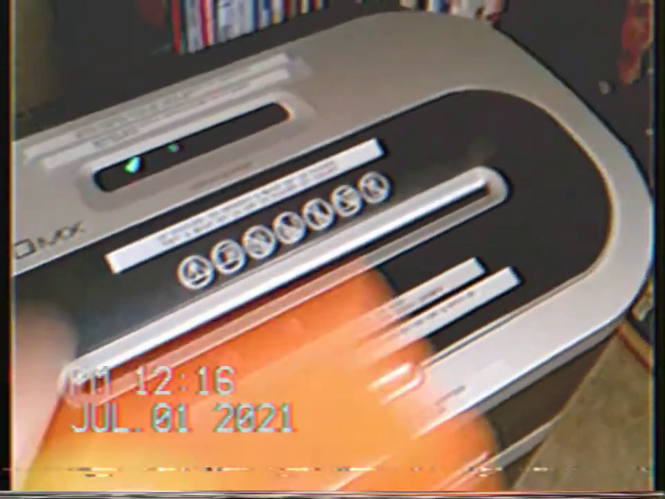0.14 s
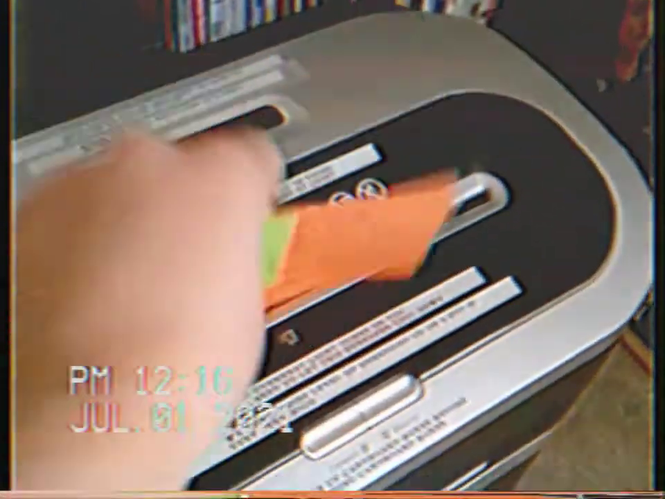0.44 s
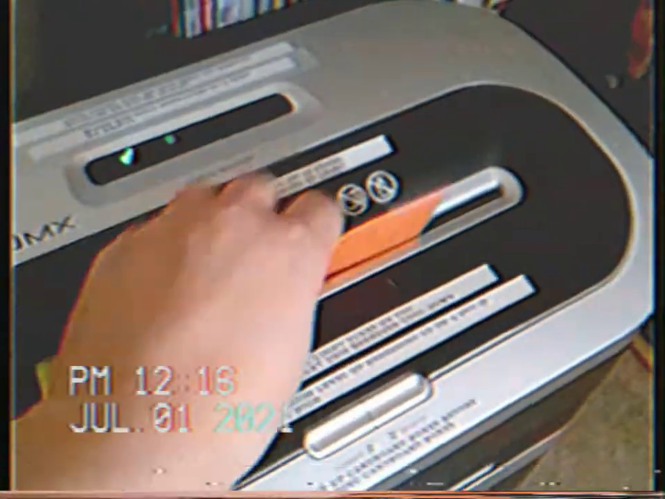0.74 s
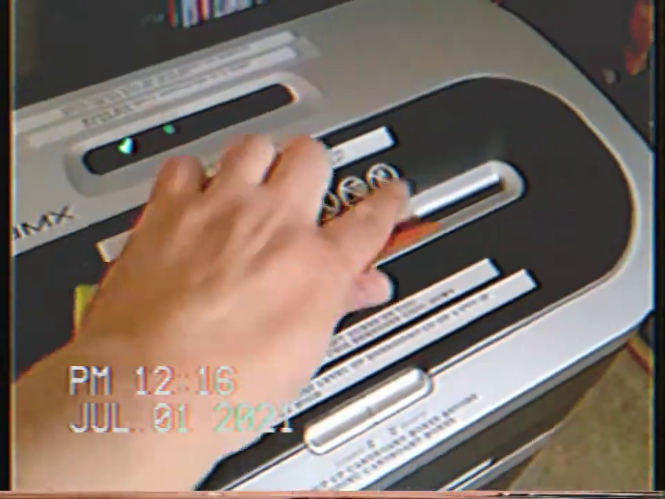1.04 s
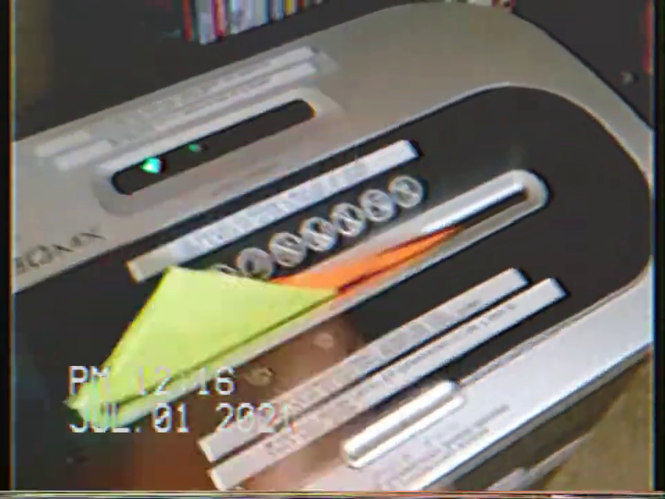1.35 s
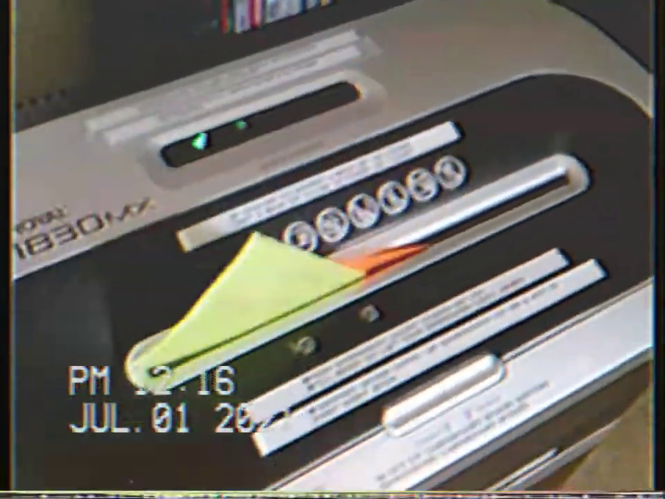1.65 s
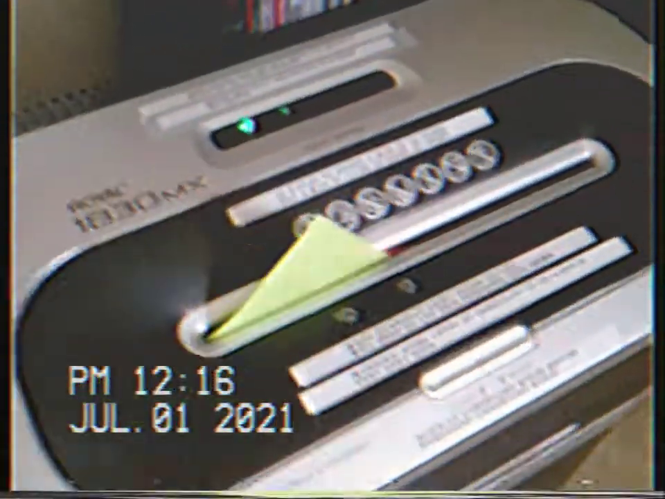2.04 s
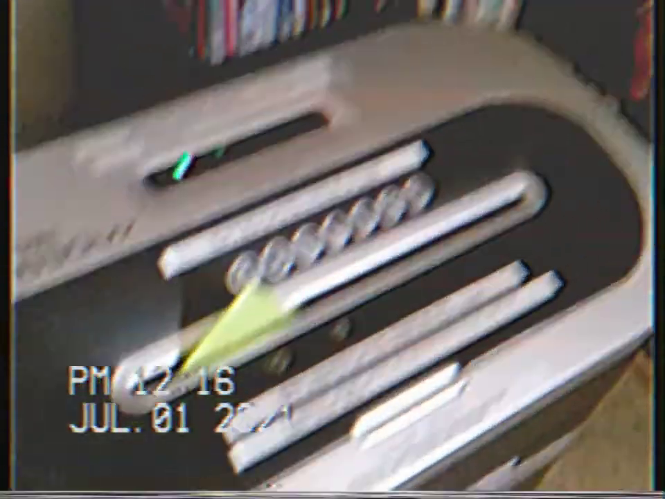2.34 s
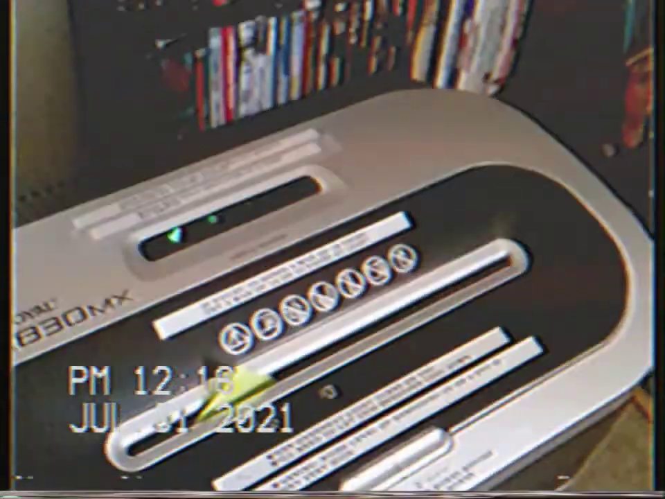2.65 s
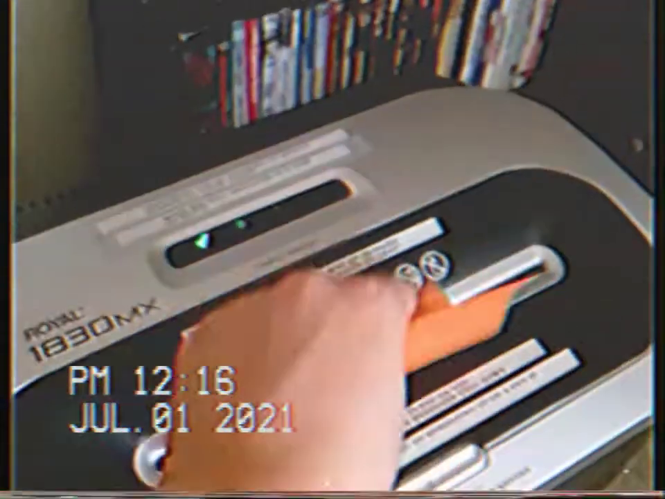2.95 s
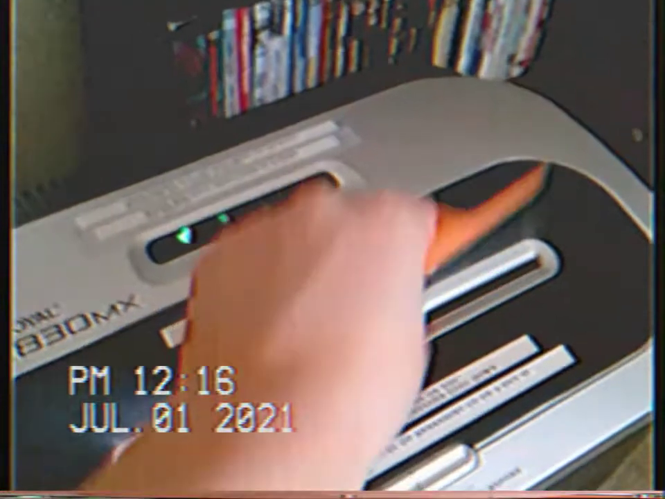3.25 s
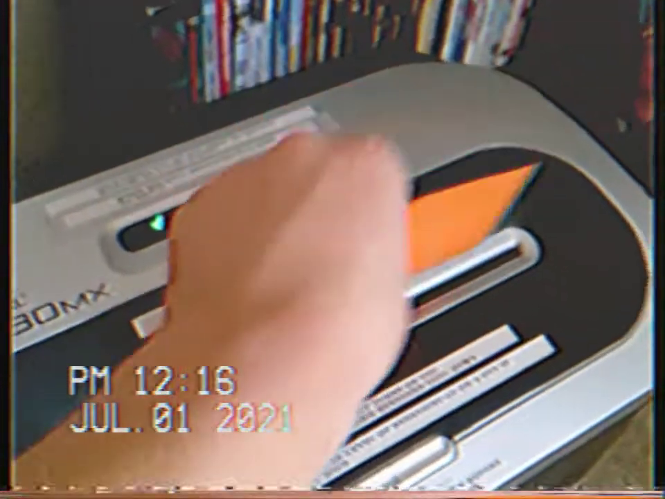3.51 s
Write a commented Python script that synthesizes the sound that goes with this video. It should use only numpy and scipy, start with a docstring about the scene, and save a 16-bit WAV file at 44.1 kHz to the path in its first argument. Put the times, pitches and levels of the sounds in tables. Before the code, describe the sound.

Paper shredder running with a low motor hum while paper crunches, crackles and finally slaps the lid.

```python
"""In a small room, a paper shredder runs close by.
Its motor hums and whines as unsteady sines, and the plastic case rumbles as coloured noise with a narrow boom.
The cutters tear sheets as clumped, grainy noise, and scuffs swell briefly out of it. Folds knock, creases crack
and the case thuds as short decaying bursts. Near the end a sheet slaps the lid, which rings in a few dull modes.
Folds, creases, thuds and slap also feed the room's noise-like tail."""
import sys
import numpy as np
from scipy import signal
from scipy.fft import rfft, irfft, next_fast_len
from scipy.io import wavfile
from scipy.ndimage import map_coordinates

SR = 44100
rng = np.random.default_rng(int(sys.argv[2]) if len(sys.argv) > 2 else 0)


def gain_from_db(level_db):
    """Turn a decibel level (scalar or array-like) into a linear amplitude factor."""
    decades = np.asarray(level_db, float) / 20
    return 10 ** decades


def to_wav(sig):
    """Store sig (one row per channel, or 1-D mono) as 16-bit WAV at the path in sys.argv[1].

    Samples outside -1..1 are clipped; the rate is SR.
    """
    pcm = np.clip(np.atleast_2d(sig), -1, 1) * 32767
    pcm = np.round(pcm).astype(np.int16)
    wavfile.write(sys.argv[1], SR, pcm.T)  # frames by channels


N = 162288  # samples

# treble of the tearing over time: start_s, level_db
TREBLE = [(0.0, -70.5), (0.59, -70.5), (0.94, -64), (1.24, -69), (1.37, -67.5), (1.92, -60.5), (2.21, -65),
          (3.1, -64.5), (3.3, -64), (3.48, -67), (3.68, -67.5)]


def unit(x):
    """Scales a signal to rms 1."""
    return x / np.sqrt(np.mean(x ** 2) + 1e-20)


def along(points, hz):
    """Reads a (pitch_hz, level_db) spectrum on a log frequency axis, near silent outside its ends."""
    point_hz, level_db = np.transpose(points)
    return np.interp(np.log(hz + 1), np.log(point_hz + 1), level_db, left=-120, right=-120)


def curves(rows):
    """Draws straight lines through each column after the time, one value per sample."""
    start_s, *columns = np.transpose(rows)
    return [np.interp(np.arange(N) / SR, start_s, column) for column in columns]


def wobble(rate_hz):
    """A smooth random curve with rate_hz knots a second."""
    knots = rng.standard_normal(int(N * rate_hz / SR) + 4)
    return map_coordinates(knots, [np.arange(N) * rate_hz / SR])


def coloured(x, spectrum):
    """Filters x through a (pitch_hz, level_db) spectrum and scales it to rms 1."""
    size = next_fast_len(len(x) + 4096)
    gain = gain_from_db(along(spectrum, np.fft.rfftfreq(size, 1 / SR)))
    return unit(irfft(rfft(x, size) * gain, size)[:len(x)])


def tone(hz, wander_hz, flutter_db):
    """A sine of about rms 1 whose pitch and level drift at random."""
    phase = 2 * np.pi * np.cumsum(hz + wander_hz * wobble(12)) / SR
    sine = np.sin(phase + rng.uniform(0, 2 * np.pi))
    return np.sqrt(2) * sine * gain_from_db(flutter_db * wobble(14))


def add_at(out, start_s, sound):
    """Mixes a short sound into out from start_s on."""
    out[round(start_s * SR):][:len(sound)] += sound


def room(x):
    """Convolves each 0.2 s stretch with a fresh noise tail whose frequencies die at their own speeds."""
    # reverberation time of the room: pitch_hz, t60_s
    decay_times = [(400, 0.28), (2000, 0.31), (6000, 0.21), (14000, 0.28)]
    out, step = np.zeros(N + SR), SR // 5
    for i in range(0, N, step):
        hz, t, noise = signal.stft(rng.standard_normal(SR // 2), SR, nperseg=256)
        t60_s = np.interp(hz, *np.transpose(decay_times))
        tail = signal.istft(noise * gain_from_db(-60 * t / t60_s[:, None]), SR, nperseg=256)[1]
        delayed = np.pad(x[i:i + step], (150, 0))  # 150 samples, about 3.4 ms
        wet = signal.fftconvolve(delayed, tail / np.linalg.norm(tail))
        out[i:i + len(wet)] += wet
    return out[:N]


def case():
    """The plastic case: broad coloured noise and a narrow noise boom; the gears follow half the boom's moves."""
    # motor noise over time: start_s, rumble_db (before a trim), boom_db, whine_db (unused here)
    motor_levels = [(0.0, -50, -54, -60), (0.54, -49.5, -53, -54), (1.2, -46.5, -44.5, -50),
                    (1.67, -45.5, -46.5, -55), (2.12, -46.5, -48.5, -54.5), (2.95, -45.5, -45, -52),
                    (3.68, -47, -50, -55.5)]
    # spectrum of the rumble: pitch_hz, relative level_db
    rumble_spectrum = [(30, -26), (55, -5.5), (90, -2.5), (140, 1), (160, -4), (200, 2.5), (260, -2.5),
                       (370, -7), (470, 0.5), (560, -3.5), (650, 0), (760, -8.5), (850, -10), (1080, -13.5),
                       (1450, -20.5), (2200, -30), (4000, -61)]
    # orders of the gear mesh: multiple of the mesh rate, mean level_db
    mesh_orders = [(1, -60), (4, -52), (5, -59), (6, -57.5)]
    mesh_hz, boom_hz, boom_width_hz = 79.5, 303.5, 27
    rumble_db, boom_db, _ = curves(motor_levels)
    rumble = coloured(rng.standard_normal(N), rumble_spectrum)
    rumble *= gain_from_db(rumble_db + 3.5 + 0.8 * wobble(24.87))
    resonance = signal.iirpeak(boom_hz, boom_hz / boom_width_hz, SR)
    boom = gain_from_db(boom_db) * unit(signal.lfilter(*resonance, rng.standard_normal(N)))
    gears = sum(gain_from_db(db) * tone(k * mesh_hz, 0.55 * k, 1.4) for k, db in mesh_orders)
    gears *= gain_from_db((boom_db - boom_db.mean()) * 0.5)
    return rumble + boom + gears


def whine():
    """Unsteady high tones over a band of noise, rising and falling together."""
    # motor noise over time: start_s, rumble_db and boom_db (both unused here), whine_db
    whine_levels = [(0.0, -50, -54, -60), (0.54, -49.5, -53, -54), (1.2, -46.5, -44.5, -50),
                    (1.67, -45.5, -46.5, -55), (2.12, -46.5, -48.5, -54.5), (2.95, -45.5, -45, -52),
                    (3.68, -47, -50, -55.5)]
    # whine tones: pitch_hz, mean level_db
    whine_tones = [(1075, -62), (1277, -69.5), (2870, -74)]
    # noise around the whine: pitch_hz, relative level_db
    upper_case = [(900, -7), (1080, -0.5), (1180, -3), (1280, 0.5), (1450, -40)]
    whine_db = curves(whine_levels)[2]
    tones = sum(gain_from_db(db) * tone(hz, 6, 2.3) for hz, db in whine_tones)
    noise = coloured(rng.standard_normal(N), upper_case)
    return gain_from_db(whine_db - whine_db.mean()) * tones + gain_from_db(whine_db - 3) * noise


def motor():
    """Mains hum and a motor tone as unsteady sines, plus a lower tone that fades out at the start."""
    # mains hum over time: start_s, level_db
    hum_levels = [(0.0, -55), (0.6, -53.5), (0.89, -51), (1.31, -45.5), (1.35, -57), (1.46, -49.5),
                  (3.68, -46)]
    # motor tone over time: start_s, level_db
    tone_levels = [(0.0, -48.5), (0.39, -44), (0.59, -53.5), (1.23, -39.5), (1.35, -46), (1.52, -40.5),
                   (1.98, -41.5), (2.09, -47.5), (2.68, -44), (2.75, -58), (3.3, -42), (3.68, -55)]
    (hum_db,), (tone_db,) = curves(hum_levels), curves(tone_levels)
    hum = gain_from_db(hum_db) * tone(119.8, wander_hz=1.26, flutter_db=0.7)
    motor_tone = gain_from_db(tone_db) * tone(223.9, wander_hz=2.6, flutter_db=2.5)
    low_hz, low_db, low_t60_s = 142.3, -37.5, 0.98
    t = np.arange(N) / SR
    low_tone = gain_from_db(low_db - 60 * t / low_t60_s) * np.sin(2 * np.pi * low_hz * t)
    return hum + motor_tone + low_tone


def grit():
    """Hiss that swells at random fibre cracks, each swell decaying in milliseconds."""
    grains_per_s, spread_db, grain_db, grain_t60_s = 400, 4.5, -10, 0.011
    sizes = gain_from_db(spread_db * rng.exponential(size=N).clip(0, 4))
    cracks = (rng.random(N) < grains_per_s / SR) * sizes
    burst = gain_from_db(-60 * np.arange(300) / SR / grain_t60_s)
    swells = unit(np.convolve(cracks, burst)[:N])
    return rng.standard_normal(N) * (1 + gain_from_db(grain_db) * swells)


def tearing():
    """The cutters tear fibres: separate body and treble grit share one clumping curve."""
    # body of the tearing over time: start_s, level_db
    body_levels = [(0.0, -62), (0.62, -60.5), (0.94, -58), (1.22, -61), (2.03, -55), (2.43, -58.5),
                   (2.72, -57.5), (3.68, -58)]
    # spectra of the body and of the treble: pitch_hz, relative level_db
    body_spectrum = [(760, -19), (1300, 0.5), (1410, -14.5), (1740, -3), (2160, -10), (2820, -9),
                     (3210, -10.5), (8000, -24.5), (10400, -53)]
    fizz_spectrum = [(3000, -30), (5500, -7.5), (7710, -7), (10100, 2), (12400, -3), (15200, -11),
                     (16000, -4)]
    (body_db,), (fizz_db,) = curves(body_levels), curves(TREBLE)
    clump = gain_from_db(0.9 * wobble(12) + 1.4 * wobble(45))  # dB, slow and quick
    body = gain_from_db(body_db) * coloured(clump * grit(), body_spectrum)
    fizz = gain_from_db(fizz_db + 1.2 * wobble(22.24)) * coloured(clump * grit(), fizz_spectrum)
    return body + fizz


def scuffs():
    """A sheet scuffs the slot: uneven grit under a quick rise and a bell-shaped fall."""
    # scuffs: start_s, level_db, length_s of the fall
    scuff_events = [(0.234, -56.5, 0.087), (0.84, -56, 0.15), (1.96, -51, 0.046), (2.194, -52, 0.03),
                    (2.61, -47, 0.043), (2.723, -43.5, 0.013), (2.739, -51.5, 0.14), (3.307, -45.5, 0.04),
                    (3.342, -45.5, 0.092)]
    # spectrum of a scuff: pitch_hz, relative level_db
    scuff_spectrum = [(700, -14), (1100, 2), (2200, 4), (4500, -2), (7000, -17), (10500, -14), (15000, -26)]
    rise_s, rustle_db = 0.0051, 2.5
    t = np.arange(N) / SR
    swell = np.zeros(N)
    for start_s, db, length_s in scuff_events:
        rise = np.clip((t - start_s) / rise_s, 0, 1)
        fall = np.exp(-(np.clip(t - start_s, 0, None) / length_s) ** 2)
        swell += gain_from_db(db) * rise * fall
    return swell * coloured(gain_from_db(rustle_db * wobble(120)) * grit(), scuff_spectrum)


def thuds():
    """The case thuds as the cutters bite: soft-edged, decaying sines."""
    # thuds: start_s, level_db (before a trim and the soft edge), pitch_hz
    thud_events = [(0.913, -30.5, 584), (1.104, -33, 650), (1.167, -32, 640), (1.335, -31, 672),
                   (1.71, -34, 552), (2.726, -28.5, 723), (2.852, -30, 657), (3.316, -27, 553)]
    trim_db, t60_s, rise_s = 0.5, 0.035, 0.0015
    out, t = np.zeros(N + SR), np.arange(SR // 20) / SR
    for start_s, db, hz in thud_events:
        envelope = gain_from_db(db + trim_db - 60 * t / t60_s) * (1 - np.exp(-t / rise_s))
        add_at(out, start_s, envelope * np.sin(2 * np.pi * hz * t))
    return out[:N]


def folds():
    """Folds knock dully in the slot: a brief ring with noise spread around its pitch."""
    # folds: start_s, level_db (before a trim and the soft edge), pitch_hz
    fold_events = [(0.05, -48, 2580), (0.2744, -46, 2850), (0.5708, -36, 1620), (0.8485, -40, 1470),
                   (0.9126, -41, 1520), (1.041, -46, 2940), (1.3357, -38, 3850), (1.3826, -45.5, 2980),
                   (1.483, -37, 1890), (1.5678, -44, 2400), (1.6474, -38, 2700), (1.66, -38.5, 3320),
                   (1.8743, -36, 2720), (1.8885, -40.5, 1980), (1.962, -38, 2800), (1.979, -44.5, 2760),
                   (2.065, -38.5, 2880), (2.107, -39, 1560), (2.129, -40, 3120), (2.1728, -44, 2350),
                   (2.2018, -40, 1490), (2.2652, -43, 1830), (2.349, -41, 3420), (2.3677, -41, 1560),
                   (2.3758, -39, 3060), (2.4264, -42.5, 1790), (2.593, -37, 1910), (2.6132, -42.5, 3470),
                   (2.6476, -45, 2750), (2.727, -37, 1400), (2.7305, -31.5, 2520), (2.7355, -41, 1800),
                   (3.0545, -43, 2430), (3.1204, -37, 2350), (3.445, -33.5, 2000)]
    trim_db, t60_s, rise_s = -0.5, 0.014, 0.00023
    noise_db, spread_octaves = -1, 0.75
    out, t = np.zeros(N + SR), np.arange(SR // 20) / SR
    for start_s, db, hz in fold_events:
        around = [(hz * 2 ** (k * spread_octaves), -5 * k * k) for k in range(-3, 4)]
        noise = coloured(rng.standard_normal(len(t)), around)
        knock = np.sin(2 * np.pi * hz * t) + gain_from_db(noise_db) * noise
        envelope = gain_from_db(db + trim_db - 60 * t / t60_s) * (1 - np.exp(-t / rise_s))
        add_at(out, start_s, envelope * knock)
    return out[:N]


def crease_noise(hz, size):
    """The bright noise of one crease: a broad spectrum lifted around its own pitch."""
    # spectrum of a crease: pitch_hz, relative level_db
    crease_spectrum = [(1800, -1), (4500, 1), (7300, -3.5), (10000, 0), (16000, -5)]
    lift_db, spread_octaves = 8, 0.25
    grid_hz = np.geomspace(crease_spectrum[0][0], crease_spectrum[-1][0], num=40)
    lift = lift_db * np.exp(-(np.log2(grid_hz / hz) / spread_octaves) ** 2)
    spectrum = np.transpose([grid_hz, along(crease_spectrum, grid_hz) + lift])
    return coloured(rng.standard_normal(size), spectrum)


def ticks():
    """Draws small creases at random moments and pitches, their levels following the tearing's treble."""
    ticks_per_s, over_treble_db, spread_db = 55, 8, 3  # levels before the creases' trim
    when, pitch, size = rng.random((round(ticks_per_s * N / SR), 3)).T
    start_s = when * N / SR
    level_db = np.interp(start_s, *np.transpose(TREBLE)) + over_treble_db
    level_db -= spread_db * np.log(size + 0.05)  # few are loud
    return list(zip(start_s, level_db, 2000 * 7 ** pitch))  # 2 to 14 kHz


def creases():
    """Creases and small ticks crack brightly: noise bursts that start at once and decay quickly."""
    # creases: start_s, level_db (before a trim), pitch_hz
    crease_events = [(0.236, -47, 9510), (0.5693, -33.5, 9800), (0.848, -39.5, 9490),
                     (0.9113, -40.5, 10700), (0.9931, -42.5, 11900), (1.259, -44, 9630), (1.297, -36, 9050),
                     (1.3336, -42, 5760), (1.359, -43, 10700), (1.3724, -44, 9800), (1.4814, -32.5, 10600),
                     (1.5658, -41, 5580), (1.648, -31.5, 9780), (1.6607, -43, 11800), (1.685, -44, 9470),
                     (1.9784, -39, 9920), (2.1063, -31, 9790), (2.3482, -30, 11400), (2.3758, -31, 11100),
                     (2.4266, -36.5, 7000), (2.6113, -33, 6840), (2.739, -38, 10500), (2.8754, -41.5, 9780),
                     (3.1208, -33, 10500), (3.1743, -37.5, 5860), (3.3864, -46, 5110), (3.447, -35, 9900)]
    trim_db, t60_s = -5.5, 0.013
    out, t = np.zeros(N + SR), np.arange(SR // 20) / SR
    for start_s, db, hz in list(crease_events) + ticks():
        envelope = gain_from_db(db + trim_db - 60 * t / t60_s)
        add_at(out, start_s, envelope * crease_noise(hz, len(t)))
    return out[:N]


def slap():
    """A new sheet hits the lid: each contact sounds the lid's decaying modes and a short noise crack."""
    # contacts of the slap: start_s, level_db
    contacts = [(3.3506, -14), (3.3533, -17.5), (3.362, -30)]
    # modes of the lid: pitch_hz, relative level_db, t60_s
    lid_modes = [(600, -2, .018), (1000, -5, .012), (1450, -4, .008), (2250, 1.5, .006), (2900, -5, .004)]
    # spectrum of the crack: pitch_hz, relative level_db
    crack_spectrum = [(400, -19), (800, 1), (1800, -6), (4000, 1), (6000, -16), (8000, -22), (9800, -11.5),
                      (12000, -34)]
    crack_db, crack_t60_s, rise_s = -3.5, 0.007, 0.00012
    out, t = np.zeros(N + SR), np.arange(SR // 10) / SR
    ring = np.zeros(len(t))
    for k, (hz, db, t60_s) in enumerate(lid_modes):
        ring += (-1) ** k * gain_from_db(db - 60 * t / t60_s) * np.sin(2 * np.pi * hz * t)  # alternating signs
    rise = 1 - np.exp(-(t / rise_s) ** 2)
    for start_s, db in contacts:
        noise = coloured(rng.standard_normal(len(t)), crack_spectrum)
        crack = gain_from_db(crack_db - 60 * t / crack_t60_s) * noise
        add_at(out, start_s, gain_from_db(db) * (ring + crack) * rise)
    return out[:N]


def scene():
    """Mixes machine, paper and room into one channel."""
    machine = case() + whine() + motor()
    paper = tearing() + scuffs()
    snaps, hit = thuds() + folds() + creases(), slap()
    snap_send_db, slap_send_db = -6, -10
    wet = room(gain_from_db(snap_send_db) * snaps + gain_from_db(slap_send_db) * hit)
    return (machine + paper + snaps + hit + wet)[None]


def low_pass(x):
    """Removes everything above the highest recorded frequency."""
    return signal.sosfilt(signal.butter(12, 16500, fs=SR, output="sos"), x)


def record(dry):
    """The microphone's band limits: a gentle low cut and a steep top."""
    low_hz, top_hz = 45, 15800
    hz = np.fft.rfftfreq(N, 1 / SR)
    low_cut = hz ** 2 / (hz ** 2 + low_hz ** 2)
    top_cut = 1 / (1 + (hz / top_hz) ** 40)
    mix = irfft(rfft(dry) * low_cut * top_cut, N)
    return low_pass(mix)


dry = scene()
out = record(dry)
to_wav(out)
```